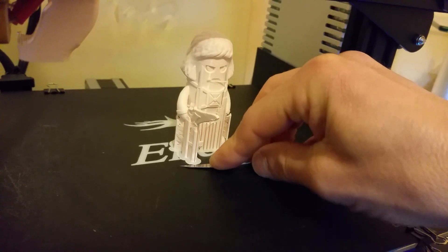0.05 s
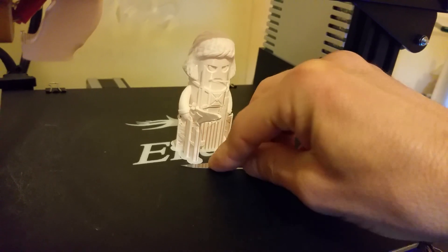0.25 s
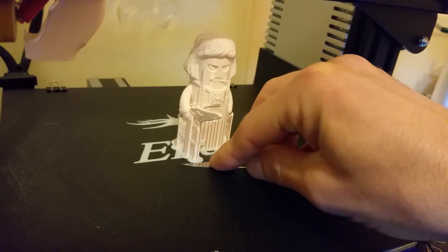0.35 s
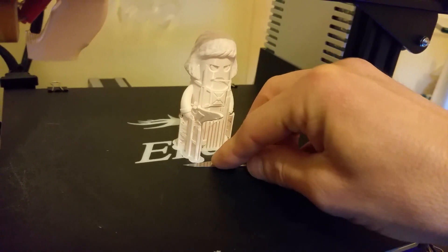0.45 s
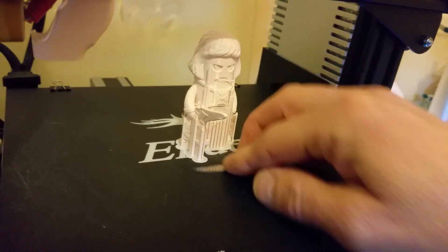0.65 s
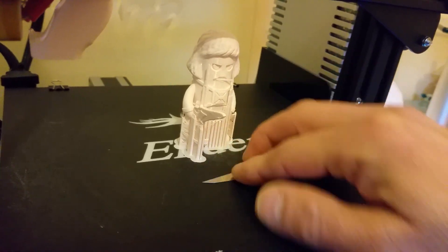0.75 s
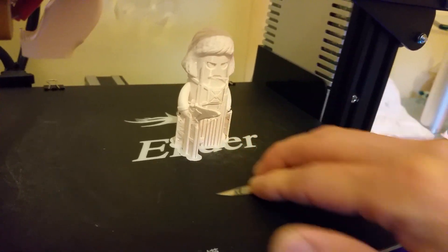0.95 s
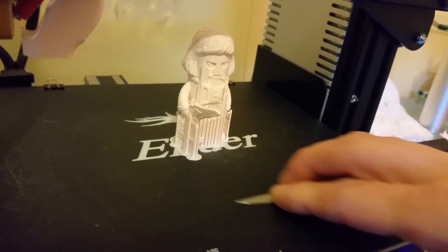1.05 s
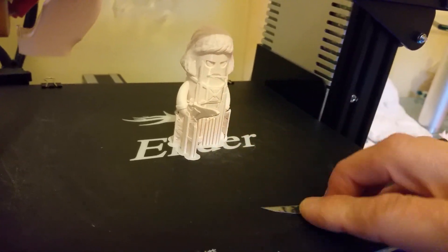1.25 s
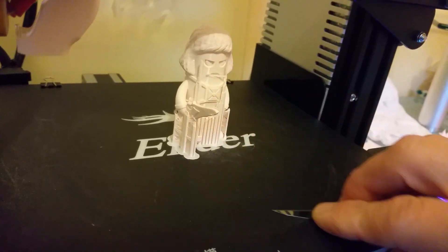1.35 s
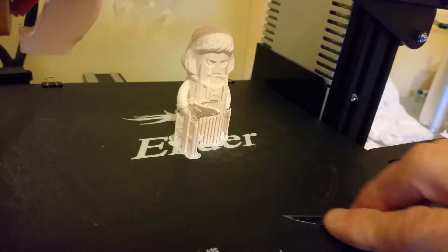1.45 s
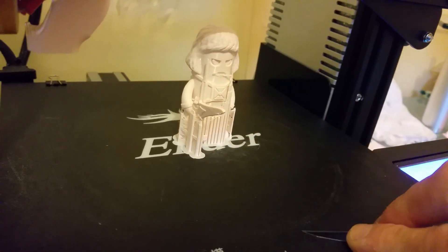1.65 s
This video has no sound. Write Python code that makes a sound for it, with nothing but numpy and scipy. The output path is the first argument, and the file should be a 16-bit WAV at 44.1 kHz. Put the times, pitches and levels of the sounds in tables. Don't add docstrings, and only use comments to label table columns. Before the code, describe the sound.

A sharp plastic crack bursts out early as a blade pops a figure off a plate, after faint dull knocks; a short room tail, a bright tick and soft rustles follow over a quiet fan, recorded close in stereo.

```python
import sys
import numpy as np
from scipy import signal
from scipy.fft import rfft, irfft, next_fast_len
from scipy.io import wavfile
from scipy.ndimage import uniform_filter1d, map_coordinates

SR = 44100
rng = np.random.default_rng(int(sys.argv[2]) if len(sys.argv) > 2 else 0)


def makeup_ratio(level_db):
    decades = np.asarray(level_db, float) / 20
    return 10 ** decades


def dump_mix(stems):
    frames = np.atleast_2d(stems).T
    limited = np.clip(frames, -1, 1)
    pcm = np.round(limited * 32767).astype(np.int16)
    wavfile.write(sys.argv[1], SR, pcm)


N = 74970
TIME_S = np.arange(N) / SR
SNAP_S = .231
RIGHT_LATE_S = .0001
PAN_SIDES = np.array([[.5], [-.5]])


def unit(x):
    return x / np.sqrt(np.mean(x ** 2) + 1e-20)


def along(points, hz):
    f, v = np.transpose(points)
    return np.interp(np.log(hz + 1), np.log(f + 1), v)


def closed(points):
    return [(points[0][0] / 2, -60), *points, (points[-1][0] * 1.3, -60)]


def wobble(rate_hz):
    knots = rng.standard_normal(int(N * rate_hz / SR) + 4)
    return map_coordinates(knots, [np.arange(N) * rate_hz / SR])


def filtered(x, response):
    m = next_fast_len(x.shape[-1] + SR // 4)
    spectrum = rfft(x, m) * response(np.fft.rfftfreq(m, 1 / SR))
    return irfft(spectrum, m)[..., :x.shape[-1]]


def resonances(peaks):
    def response(f):
        return sum((-1) ** k * makeup_ratio(db) * 1j * f * width / (hz * hz - f * f + 1j * f * width)
                   for k, (hz, width, db) in enumerate(peaks))
    return response


def pair(alike):
    def mid_side(hz):
        turn = np.arccos(np.clip(along(alike, hz), -1, 1)) / 2
        return np.array([np.cos(turn), np.sin(turn)])
    mid, side = filtered(rng.standard_normal((2, N)), mid_side)
    return np.array([mid + side, mid - side])


def late_ages(start_s):
    return TIME_S - start_s - RIGHT_LATE_S * np.array([[0], [1]])


def fan():
    # (time [s], speed [Hz])
    shaft = [(0, 112.62), (1.7, 112.85)]
    orders = {.5: (-64, -76), 1: (-56, -58.5), 7: (-54.5, -67.5), 14: (-59, -82), 16: (-54, -72),
              20: (-44.5, -55.5), 21: (-68, -76), 23: (-58.5, -77.5), 24: (-48.5, -71.5), 25: (-68, -77),
              28: (-51, -59), 32: (-55.5, -70), 36: (-57.5, -64)}
    # (frequency [Hz], density [dB per Hz])
    air_colour = [(40, -13.5), (110, -3.5), (450, -1), (1150, -0.5), (1700, -6), (2500, 0.5), (3800, -2),
                  (6200, -19)]
    # (frequency [Hz], left minus right [dB])
    air_pan = [(60, 2), (110, 5.5), (200, 3), (380, 6), (700, 3.5), (1290, 9), (2380, 12.5), (4400, 13),
               (8120, -8), (15000, 1.5)]
    # (frequency [Hz], likeness [1])
    air_alike = [(100, 0.75), (700, 0.61), (3000, 0.36), (7000, .1)]
    tone_wobble_db, air_db, left_lead_s = 1.5, -44, 0.00028
    turn = 2 * np.pi * np.cumsum(np.interp(TIME_S, *np.transpose(shaft))) / SR
    tones = np.zeros((2, N))
    for multiple, db in orders.items():
        gain = makeup_ratio(np.array(db)[:, None] + tone_wobble_db * wobble(16))
        phase = .25 * wobble(8.3) + rng.uniform(0, 2 * np.pi)
        tones += gain * np.sin(multiple * turn + phase)
    air = filtered(pair(air_alike),
                   lambda hz: makeup_ratio(along(closed(air_colour), hz) + PAN_SIDES * along(air_pan, hz)))
    both = tones + makeup_ratio(air_db + .5 * wobble(9)) * unit(air)
    return filtered(both, lambda hz: np.exp(2j * np.pi * hz * left_lead_s * PAN_SIDES))


def hiss():
    # (frequency [Hz], density [dB per Hz])
    hiss_colour = [(5500, -10.5), (7000, 2), (10000, 0), (15500, -6)]
    noise = filtered(rng.standard_normal((2, N)), lambda hz: makeup_ratio(along(closed(hiss_colour), hz)))
    return makeup_ratio(-69 + 1.5 * wobble(6)) * unit(noise)


def knocks():
    # (time [s], level [dB], frequency [Hz], t60 [s])
    plate_knocks = [
        (.0, -49, 60, 0.58),
        (0.051, -40.5, 123.6, 0.17),
        (0.069, -40, 215, 0.1),
        (.115, -41.5, 111.6, 0.25),
        (0.167, -47, 106.6, 0.31),
        (0.284, -33, 193, 0.11),
        (.452, -32.5, 408, 0.065),
        (1.28, -47, 84.4, 0.26),
    ]
    rise_s, right_db = 0.0077, -4
    ring = np.zeros(N)
    for start_s, db, hz, t60_s in plate_knocks:
        age = np.maximum(TIME_S - start_s, 0)
        swell = makeup_ratio(db - 60 * age / t60_s) * (1 - np.exp(-age / rise_s))
        ring += swell * np.sin(2 * np.pi * hz * age)
    return ring * makeup_ratio([[0], [right_db]])


def ticks():
    # (time [s], level [dB], centre [Hz])
    blade_ticks = [
        (.1095, -38, 13000),
        (.2030, -38, 12000),
        (.2031, -26, 2300),
        (.6835, -21, 10300),
        (.6837, -24, 15000),
        (.6845, -32, 3300),
        (1.072, -38, 9000),
        (1.538, -35, 14200),
        (1.57, -44, 14000),
    ]
    ring_t60_cycles, fuzz_share, fuzz_t60_s = 22, .5, .009
    out = np.zeros((2, N))
    for start_s, db, hz in blade_ticks:
        age = late_ages(start_s)
        ring = np.cos(2 * np.pi * hz * age) * makeup_ratio(-60 * np.abs(age) * hz / ring_t60_cycles)
        fuzz = fuzz_share * rng.standard_normal((2, N)) * makeup_ratio(-60 * np.abs(age) / fuzz_t60_s)
        out += makeup_ratio(db) * filtered((ring + fuzz) * (age >= 0), resonances([(hz, .6 * hz, 0)]))
    return out


def rustles():
    # (middle time [s], length [s], level [dB], centre [Hz])
    sleeve_rubs = [(0.2, 0.0096, -53, 11000), (0.197, .012, -54, 4780), (0.209, .01, -43, 1000),
                   (0.706, 0.078, -65.5, 8000), (.79, 0.09, -61, 10400), (0.914, 0.16, -63.5, 10000),
                   (0.978, 0.033, -63, 10180), (1.086, 0.1, -58.5, 10200), (1.19, 0.13, -57, 10430),
                   (1.262, 0.021, -52.5, 6200), (1.286, 0.041, -52.5, 9100), (1.326, 0.036, -59.5, 9400),
                   (1.402, .014, -59, 6000), (1.414, 0.049, -57.5, 10100), (1.65, 0.065, -59.5, 14300)]
    out = np.zeros((2, N))
    for middle_s, length_s, db, hz in sleeve_rubs:
        grain = rng.standard_normal((2, N)) * makeup_ratio(2 * wobble(300))
        band = resonances([(hz, .65 * hz, 0)])
        swell = np.exp(-(2 * (TIME_S - middle_s) / length_s) ** 2)
        out += makeup_ratio(db) * swell * unit(filtered(grain, lambda f: band(f) ** 2))
    return out


def snap():
    # (frequency [Hz], left level [dB], right level [dB], t60 [s])
    modes = [(610, -7, -32, 0.0103), (1260, -5.5, -20.5, 0.015), (1707, -11.5, -23.5, 0.011),
             (2204, -6.5, -22.5, 0.018), (2776, -11, -16, .025), (3300, -14, -13, 0.034),
             (3480, -5.5, -20.5, 0.018), (4310, -2.5, -11.5, 0.00794), (5320, 0.5, -29, 0.015),
             (6010, -3, -4, 0.00906), (9160, -7.5, -6.5, 0.0069), (11230, -5, -11, .008),
             (12700, -18, -3, 0.00711), (14490, -9, -3.5, .008)]
    # (frequency [Hz], width [Hz], level [dB])
    grit_peaks = [(1594, 2180, 0), (5010, 3500, 0.5), (12500, 13000, -1)]
    # (frequency [Hz], level [dB], t60 [s])
    table_modes = [(54.2, -41.5, .8), (105, -34.5, .3), (210, -49.5, 0.75)]
    ring_db, grit_db = 2.5, -5.5
    burst_t60_s, onset_t60_s = .016, 0.0065
    spike_db, spike_s = 3, .00015
    jolt_db, jolt_right_db = 4.5, -33
    push_s, rebound_s, rebound = .0021, .0014, .46
    age = late_ages(SNAP_S)
    live = np.maximum(age, 0)

    decay = makeup_ratio(-60 * live / burst_t60_s) + 2.5 * makeup_ratio(-60 * live / onset_t60_s)
    burst = rng.standard_normal((2, N)) * (age >= 0) * decay
    burst -= makeup_ratio(spike_db - grit_db) * np.sinc((age - spike_s) * SR / 1.5) * 2
    ring = np.zeros((2, N))
    for k, (hz, left_db, right_db, t60_s) in enumerate(modes):
        gain = makeup_ratio(np.array([[left_db], [right_db]]) - 60 * live / t60_s)
        ring += gain * (-1) ** k * np.sin(2 * np.pi * hz * live)
    crack = makeup_ratio(ring_db) * ring + makeup_ratio(grit_db) * filtered(burst, resonances(grit_peaks))

    back = np.maximum(live - .9 * push_s, 0) / rebound_s
    push = rebound * back * np.exp(1 - back) - np.sin(np.pi * np.minimum(live / push_s, 1))
    jolt = makeup_ratio(jolt_db) * push * makeup_ratio([[0], [jolt_right_db]])

    hum = sum(makeup_ratio(db - 60 * live / t60_s) * np.sin(2 * np.pi * hz * live) for hz, db, t60_s in table_modes)
    return crack + jolt + hum * makeup_ratio([[0], [-3]])


def room_tail():
    # (frequency [Hz], density [dB per Hz])
    tail_colour = [(150, -10), (800, -10), (1230, -5.5), (1900, -4), (3400, -2), (5500, -4.5), (7600, -12),
                   (10500, -6), (15800, -7)]
    # (frequency [Hz], t60 [s])
    tail_t60 = [(200, 0.12), (1200, 0.27), (4000, 0.28), (8000, 0.27), (15000, 0.22)]
    # (frequency [Hz], left minus right [dB])
    tail_pan = [(200, -2), (1300, 5.5), (4400, -0.5), (8000, -1), (15000, -5)]
    tail_db, rise_s, patchy_db, grain_db = -17, 0.0079, 2, 2
    noise = pair([(200, .85), (700, 1.0), (1400, .02)])
    hz, t, z = signal.stft(noise, SR, nperseg=128)
    colour = makeup_ratio(along(closed(tail_colour), hz) + PAN_SIDES * along(tail_pan, hz))[:, :, None]
    colour = colour / np.sqrt(np.mean(colour ** 2))
    age = np.maximum(t - SNAP_S, 0)
    fade = makeup_ratio(-60 * age / along(tail_t60, hz)[:, None]) * (1 - np.exp(-age / rise_s))
    patches = uniform_filter1d(rng.standard_normal(z.shape[1:]), size=2, axis=0)
    patches = uniform_filter1d(patches, size=7, axis=1)
    fade = fade * makeup_ratio(grain_db * unit(patches))
    tail = signal.istft(z * colour * fade, SR, nperseg=128)[1][:, :N]
    return makeup_ratio(tail_db + patchy_db * np.array([wobble(350), wobble(350)])) * tail


def scene():
    top_hz, click_top_hz = 15750, 16300
    steady = filtered(fan() + hiss() + rustles() + room_tail(),
                      lambda hz: np.clip((top_hz - hz) / 250 + .5, 0, 1))
    clicks = filtered(ticks() + snap(), lambda hz: 1 / (1 + (hz / click_top_hz) ** 40))
    return steady + knocks() + clicks


def band_limit(x):
    return signal.sosfilt(signal.butter(12, 17160, fs=SR, output="sos"), x)


def record(dry):
    # (time [s], gain [dB])
    gain_ride = [(0, -1), (.1, -2.5), (.206, -0.5), (.21, -3), (0.223, -10.5), (.225, -12.5), (0.241, -9),
                 (.26, -7), (.33, -8.5), (.43, -11), (.6, -14.5), (.95, -14.5), (1.301, -14.5),
                 (1.451, -13.5), (1.55, -11), (1.7, -7)]
    ridden = dry * makeup_ratio(np.interp(TIME_S, *np.transpose(gain_ride)))
    return band_limit(np.clip(ridden, -1, 1))


dry = scene()
out = record(dry)
dump_mix(out)
```